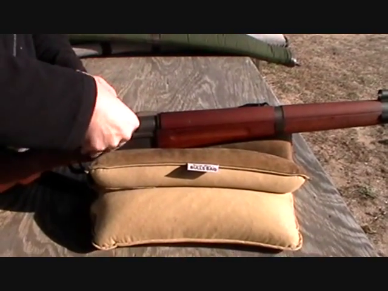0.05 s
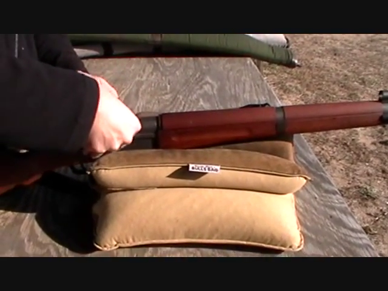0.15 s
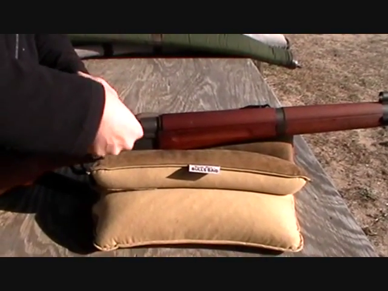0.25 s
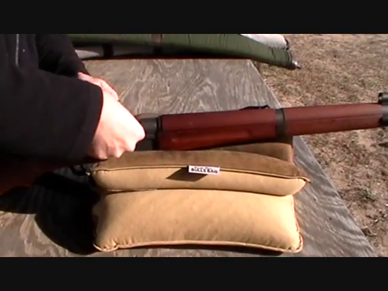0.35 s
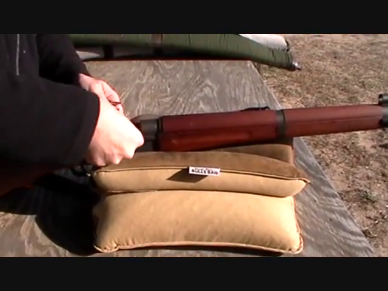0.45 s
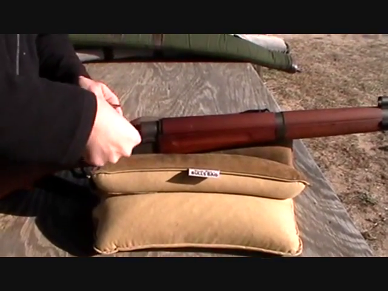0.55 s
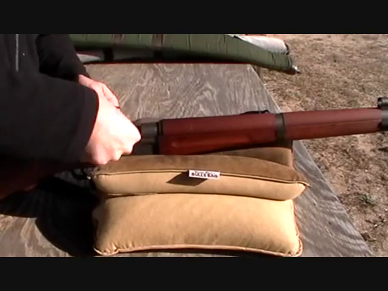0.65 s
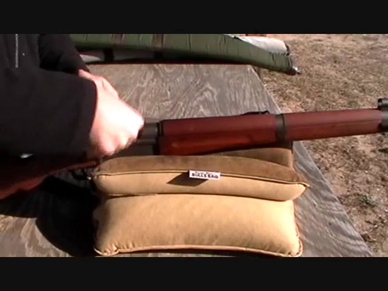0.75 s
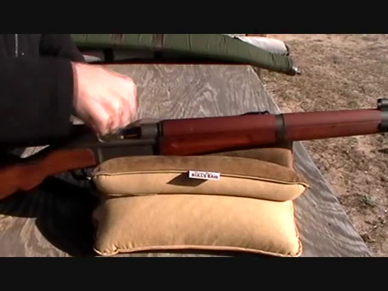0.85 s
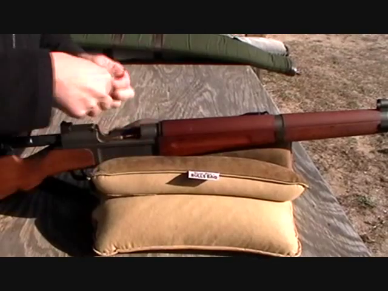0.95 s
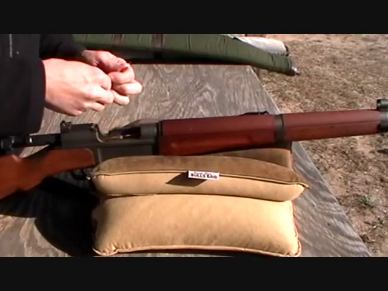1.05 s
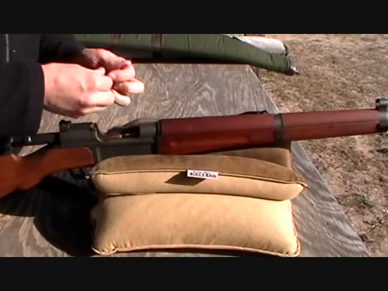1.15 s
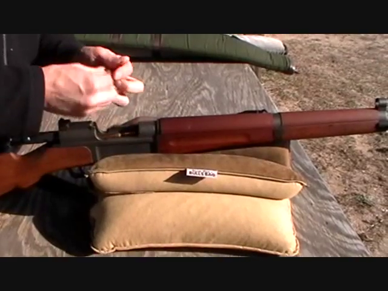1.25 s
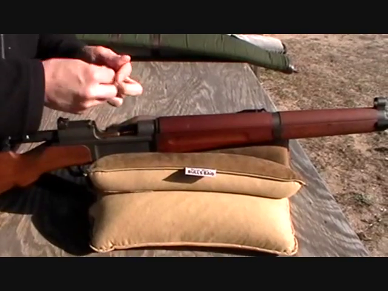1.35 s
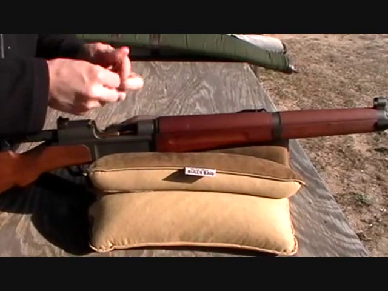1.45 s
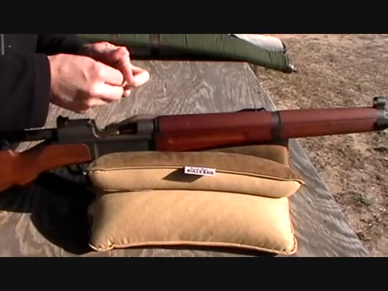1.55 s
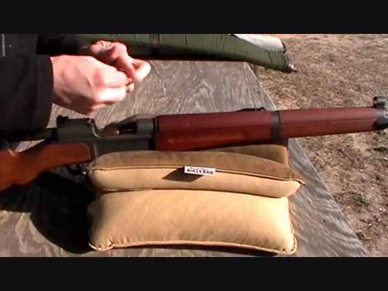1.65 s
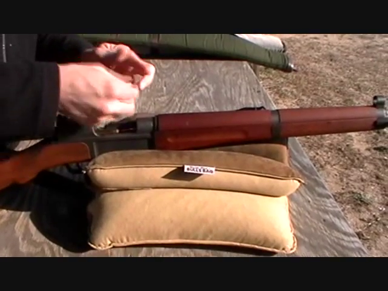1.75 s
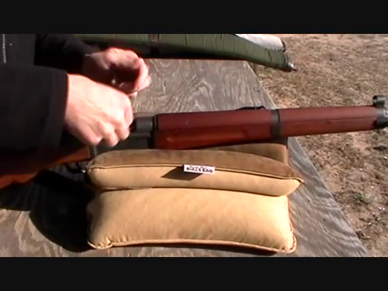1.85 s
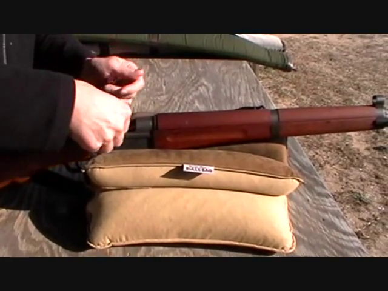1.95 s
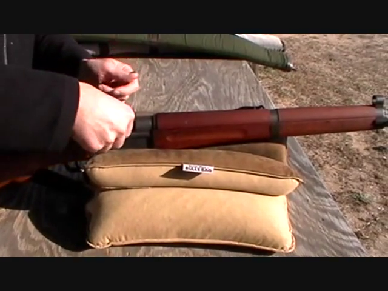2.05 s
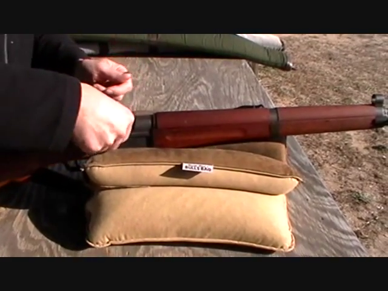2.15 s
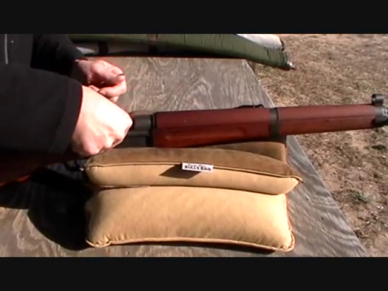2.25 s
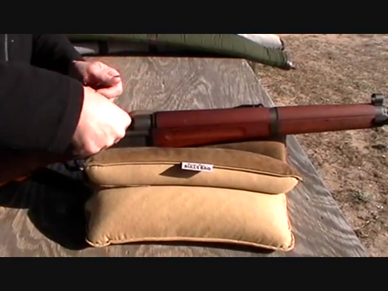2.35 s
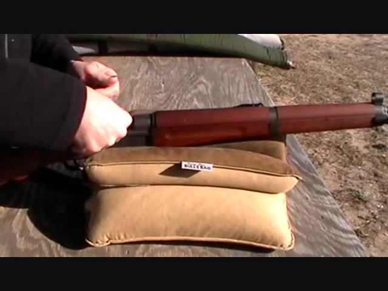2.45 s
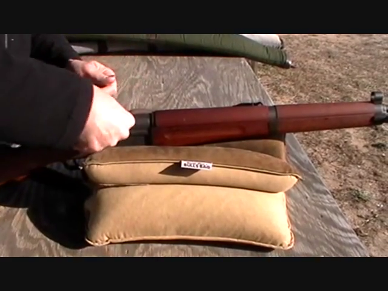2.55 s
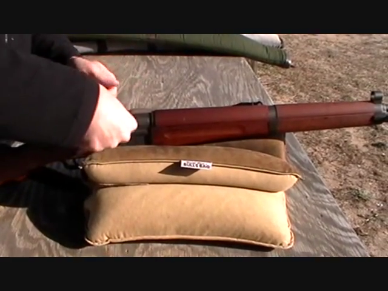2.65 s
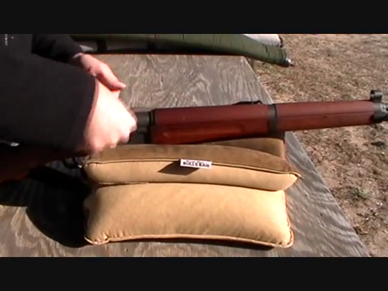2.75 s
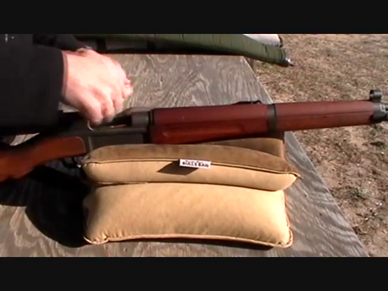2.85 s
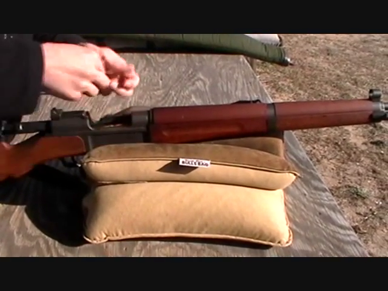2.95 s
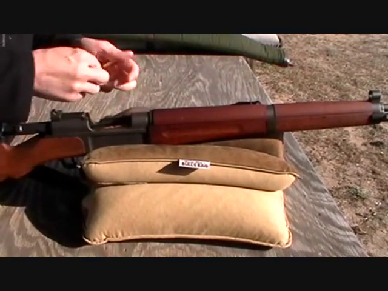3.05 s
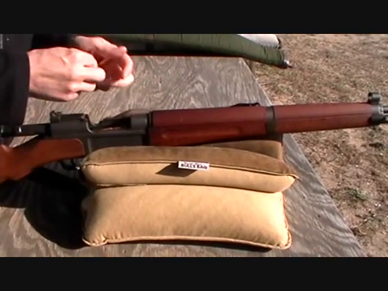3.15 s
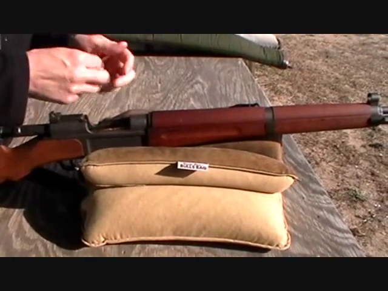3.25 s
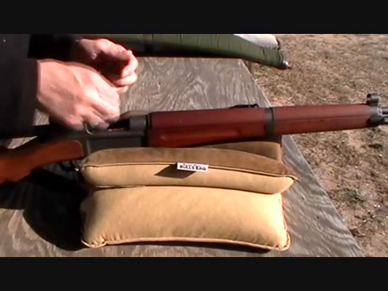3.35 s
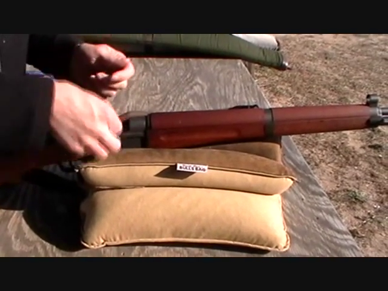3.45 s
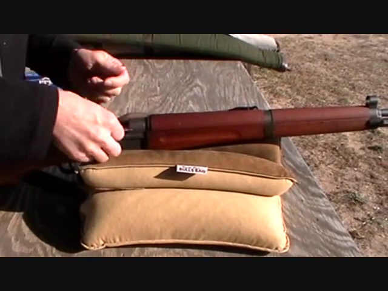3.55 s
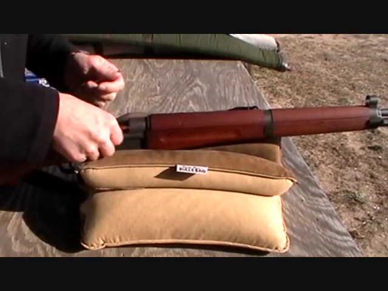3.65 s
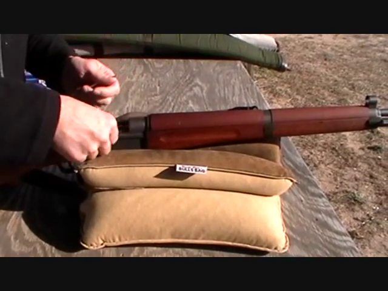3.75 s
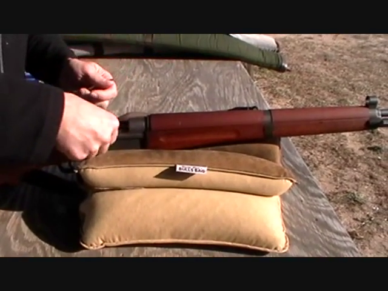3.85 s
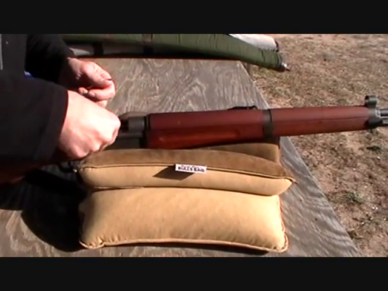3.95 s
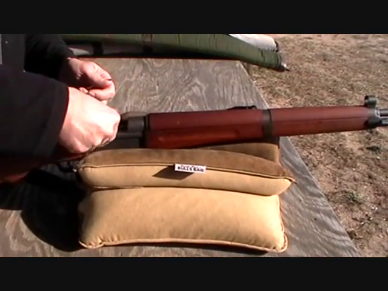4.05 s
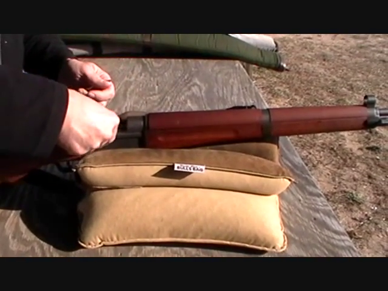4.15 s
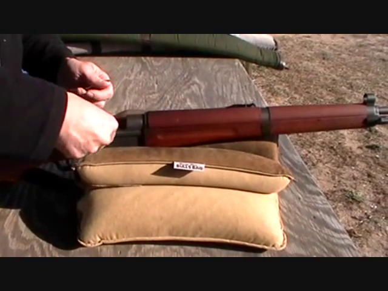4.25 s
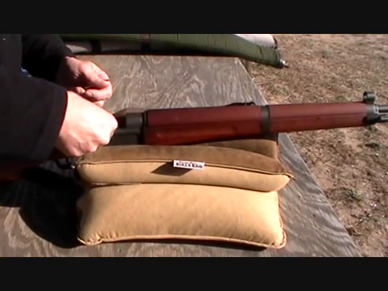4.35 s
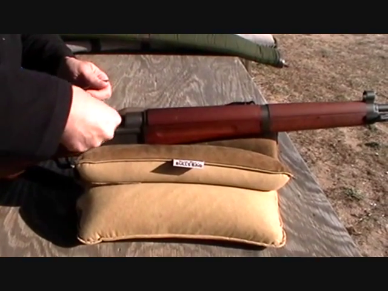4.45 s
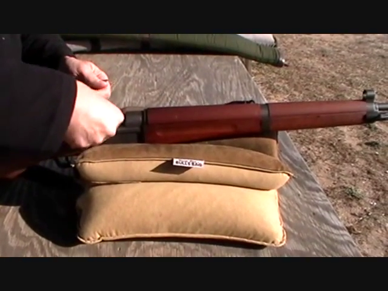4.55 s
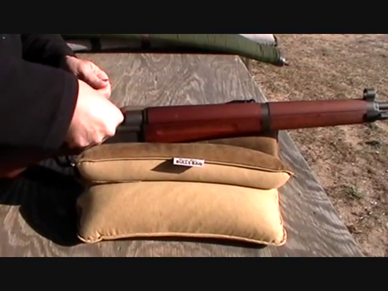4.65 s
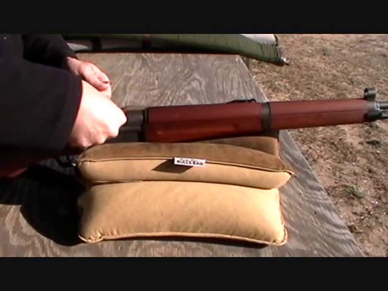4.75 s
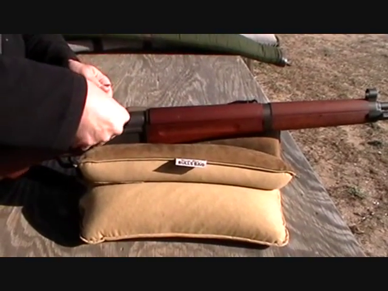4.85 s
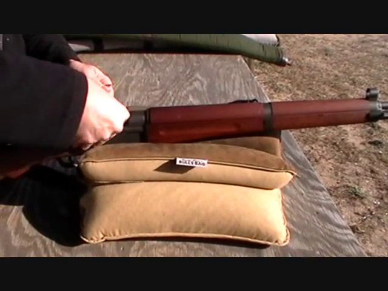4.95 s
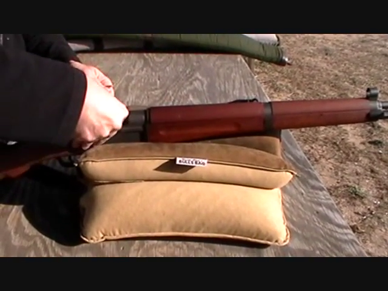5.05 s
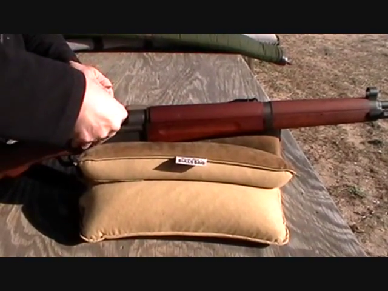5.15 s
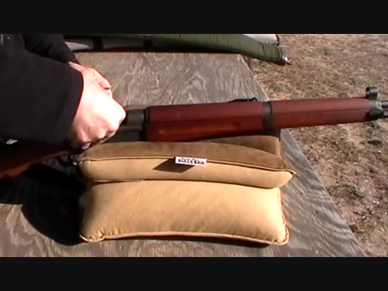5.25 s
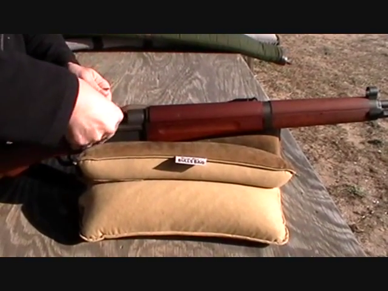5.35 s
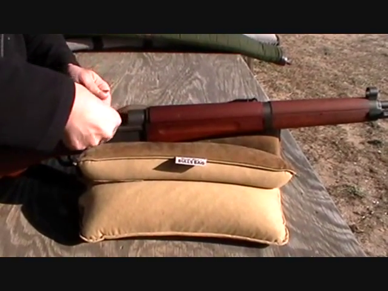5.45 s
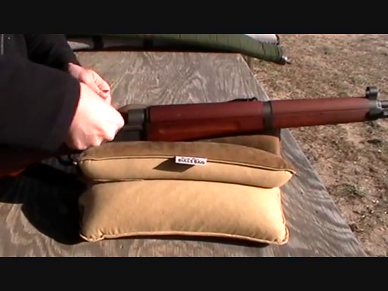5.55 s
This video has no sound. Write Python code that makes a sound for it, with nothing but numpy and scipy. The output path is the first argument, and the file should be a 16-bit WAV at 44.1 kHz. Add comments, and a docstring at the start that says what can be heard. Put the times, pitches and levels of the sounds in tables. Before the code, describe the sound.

Close, sharp metallic clacks and small brass pings as rounds are pressed into a rifle, with quiet handling pauses and faint open-air noise.

```python
"""A soft outdoor rush, made of shaped noise, runs throughout, with faint ticks of cases in a palm. From 0.1 s a
brass cartridge is pressed into a rifle on sandbags: scraping noise, cracks that ring steel, a thud. Skin and
sleeve brush past from 0.4 s, loose cases clink from 0.5 s as ringing tones, and knocks start at 0.9 s. More
cases are pressed in from 2.5 s, between short scrapes, the last one at 5.4 s. The shooting shelter answers each
contact with decaying noise echoes, and the open ground echoes faintly."""
import sys
import numpy as np
from scipy import signal
from scipy.fft import rfft, irfft, next_fast_len
from scipy.io import wavfile
from scipy.ndimage import uniform_filter1d

SR = 44100
rng = np.random.default_rng(int(sys.argv[2]) if len(sys.argv) > 2 else 0)


def persist_wave(psi):
    """Save psi, clipped to +-1, as 16-bit WAV."""
    counts = np.round(np.clip(psi, -1, 1) * 32767).astype(np.int16)
    wavfile.write(sys.argv[1], SR, np.atleast_2d(counts).T)


N = 247401
T = np.arange(SR // 4) / SR  # a quarter second of time, enough for one contact

# how the steel action rings when struck: f/Hz, level/dB, time to fall 60 dB (t60)/s
STEEL_MODES = [(416.7, -22, 0.12), (824.5, -13.5, 0.068), (1286, -16, 0.056), (1736, -1, 0.022),
               (3030, -12.5, 0.017), (3203, -7, 0.04), (3490, -5.5, 0.053), (3772, -10.5, 0.051),
               (5197, -4, 0.035), (5805, -12, 0.028), (6665, 1.5, 0.013), (7590, -9, 0.028),
               (9850, -13.5, .03), (10750, -2.5, 0.022)]
# tone of a hard crack or rub: f/Hz, level per Hz/dB
CRACK_TONE = [(45, -57), (130, -27), (300, -19.5), (580, -26.5), (800, -4.5), (1100, -5.5), (1800, 2),
              (2400, -1), (3100, 6), (4500, -4), (7000, -2), (9000, -6), (11000, -9), (12200, -14),
              (15500, -19)]


def amp(db):
    """Turn decibels into a gain."""
    return 10 ** (np.asarray(db) / 20)


def unit(x):
    """Scale x to an average (rms) level of 1."""
    return x / np.sqrt(np.mean(x ** 2) + 1e-20)


def unit_attack(x):
    """Scale x to rms 1 over the loudest 3.5 ms of its first 0.1 s."""
    loudest = uniform_filter1d(x[:SR // 10] ** 2, size=154).max()
    return x / np.sqrt(loudest + 1e-20)


def along(points, hz):
    """Read a curve of (Hz, value) points, spaced as the ear hears pitch (log axis)."""
    f, v = np.transpose(points)
    return np.interp(np.log(hz + 1), np.log(f + 1), v)


def add(track, s, x):
    """Mix x into the track at time s."""
    i = round(s * SR)
    track[..., i:i + x.shape[-1]] += x[..., :N - i]


def filtered(x, response):
    """Multiply the spectrum of x by a response to frequency."""
    m = next_fast_len(N + SR // 2)
    spectrum = rfft(x, m) * response(np.fft.rfftfreq(m, 1 / SR))
    return irfft(spectrum, m)[..., :N]


def coloured(x, points, size=1024):
    """Give x the tone of (Hz, dB) points, with a filter that never sounds ahead of its input."""
    gain = amp(along(points, np.fft.rfftfreq(size, 1 / SR)))
    cepstrum = irfft(np.log(gain))
    # folding the cepstrum forward in time gives the minimum-phase filter
    cepstrum[1:size // 2] *= 2
    cepstrum[size // 2 + 1:] = 0
    impulse = irfft(np.exp(rfft(cepstrum)))
    return signal.fftconvolve(x, impulse)[:len(x)]


def voiced(x, body_db, presence_db, treble_db):
    """The place and hardness of a contact weight its lows and highs around the 3 kHz clack."""
    low = [(2000, body_db), (2900, 0.0015), (3650, 0.0022)]
    high = [(4600, presence_db), (6900, presence_db), (8600, treble_db)]
    return coloured(x, low + high)


def ring(modes, spread_db, detune):
    """Struck metal or wood: a sum of fading (Hz, dB, t60) tones, a little different each time."""
    out = np.zeros(len(T))
    luck = rng.standard_normal((len(modes), 3))
    for (hz, db, t60), (level, pitch, sign) in zip(modes, luck):
        t = T[T < t60]
        strength = np.sign(sign) * amp(db + spread_db * level)
        fade = np.exp(-np.log(1000) * t / t60)
        tone = np.sin(2 * np.pi * hz * (1 + detune * pitch) * t)
        out[:len(t)] += strength * fade * tone
    return out


def burst(t60, hold):
    """Metal chatters on metal for an instant (noise), then dies away."""
    return rng.standard_normal(len(T)) * amp(-60 * np.maximum(T - hold, 0) / t60)


def rush(spectrum, patchy_db):
    """Stereo noise of rms 1 whose gain varies in random patches of time and pitch."""
    # how alike left and right are: f/Hz, likeness from 0 to 1
    likeness = [(60, 0.68), (130, 1), (290, 0.87), (640, 0.87), (1410, 0.86), (3100, 0.6), (6820, 0.4),
                (15000, 0.37)]
    z = signal.stft(rng.standard_normal((2, N)), nperseg=512)[2]
    field = uniform_filter1d(rng.standard_normal(z.shape[1:]), size=4, axis=0)
    field = uniform_filter1d(field, size=20, axis=1)
    pair = signal.istft(z * amp(patchy_db * unit(field)), nperseg=512)[1][:, :N]

    def mid_and_side(hz):
        turn = np.arccos(np.clip(along(likeness, hz), -1, 1)) / 2
        return amp(along(spectrum, hz)) * [np.cos(turn), np.sin(turn)]

    mid, side = filtered(pair, mid_and_side)
    return unit(np.array([mid + side, mid - side]))


def outdoors():
    """Far rumble, two slowly shifting bands of rush around 0.8 and 1.6 kHz, and a thin hiss, all shaped noise."""
    # slow rise and fall of the rush: t/s, low rush level/dB, high rush level/dB
    rush_levels = [(0.0, -56.5, -53), (1.14, -56.5, -56), (1.54, -57, -52), (2.7, -50.5, -53.5),
                   (3.4, -51.5, -54.5), (3.87, -51.5, -52.5), (5.27, -52, -52.5), (5.6, -48.5, -52)]
    # tones of far rumble, low rush, high rush and hiss: f/Hz, level per Hz/dB
    rumble_tone = [(15, -43), (28, -21), (43, -10), (65, -3.5), (100, 0), (150, 2.5), (200, -6), (300, -5),
                   (450, -6), (620, -19), (900, -32), (2000, -81)]
    low_tone = [(100, -50.5), (300, -30), (600, -7), (800, 1.5), (1100, -2), (1400, -5.5), (2000, -27.5),
                (4000, -71)]
    high_tone = [(900, -27), (1300, -2), (1650, 3.5), (2000, -5.5), (2500, -6), (3200, -21), (5000, -34.5),
                 (9000, -62)]
    hiss_tone = [(1500, -13.5), (3000, 5), (5000, 1.5), (8000, -2.5), (11000, -5.5), (15500, -9.5)]
    s, *columns = np.transpose(rush_levels)
    low_db, high_db = [np.interp(np.arange(N) / SR, s, c) for c in columns]
    # each rush has a constant gain on top of its moving level
    low_gain_db, high_gain_db = 1.6, -0.07
    low = amp(low_db + low_gain_db) * rush(low_tone, patchy_db=1.0)
    high = amp(high_db + high_gain_db) * rush(high_tone, patchy_db=0.5)
    hiss = amp(-65) * rush(hiss_tone, patchy_db=.8)
    rumble = amp(-54.5) * rush(rumble_tone, patchy_db=1.5)
    return low + high + rumble + hiss


def fingers(level_db, count=40):
    """Faint ticks of cases shifting in the palm: fading noise at random times."""
    track, t = np.zeros(N), T[:SR // 25]
    for when, size, length in rng.random((count, 3)):
        tick = rng.standard_normal(len(t)) * amp(-60 * t / (.008 + 0.05 * length))
        add(track, when * (N - 1) / SR, amp(level_db + 9 * size) * tick)
    return voiced(coloured(track, CRACK_TONE), -2.5, 3.6, 4)


def slide(length, scrape_db, hollow_db):
    """Tiny slips of a case along the steel rattle the action and make the magazine ring."""
    # hollow ring of the magazine: f/Hz, level/dB, t60/s
    hollow_modes = [(435, -22, 0.054), (794, -3, 0.087), (834, -1.5, 0.051), (1180, -5.5, 0.025),
                    (1600, 0, 0.02345)]
    stroke = np.clip(np.minimum(T, length - T) / .005, 0, 1)  # 5 ms to start and to stop
    grain = amp(5.4 * rng.standard_normal(len(T)))
    slips = stroke * rng.standard_normal(len(T)) * grain

    def through(modes):
        body = ring(modes, spread_db=1.5, detune=.008)
        return unit_attack(signal.fftconvolve(slips, body)[:len(T)])

    rough = unit_attack(coloured(slips, CRACK_TONE))
    scrape = unit_attack(voiced(rough + amp(-13.5) * through(STEEL_MODES), -1.7, 0, -0.38))
    return amp(scrape_db) * scrape + amp(hollow_db) * through(hollow_modes)


def rattle(t60, uneven_db, count=90):
    """Loose parts bounce a few hundred times a second, unevenly, as they settle."""
    bounces = np.interp(T, np.linspace(0, T[-1], count), rng.standard_normal(count))
    shake = unit(amp(uneven_db * np.clip(bounces, -2, 2)))
    return rng.standard_normal(len(T)) * shake * amp(-60 * T / t60)


def snap(body_db, bright_db):
    """Each contact is a hard crack that sets the steel action ringing; spring and loose parts rattle on."""
    # a brighter contact has more presence too, and is more crack than ring
    presence_db = 2.5 + 0.55 * bright_db
    steel_db = -5.5 - .15 * bright_db
    crack = unit_attack(coloured(burst(t60=0.013, hold=0.0012), CRACK_TONE))
    steel = amp(steel_db) * unit_attack(ring(STEEL_MODES, spread_db=0.5, detune=0.011))
    blow = unit_attack(voiced(crack + steel, body_db, presence_db, bright_db))
    loose = unit(voiced(coloured(rattle(t60=0.23, uneven_db=8.0), CRACK_TONE), 0.87, 3, 2))
    return blow + amp(-39.5) * loose


def thud():
    """A firm push passes through the sandbags, which soften its start, into the bench top."""
    # ring of the bench top: f/Hz, level/dB, t60/s
    bench_modes = [(97, 3, 0.2), (130, -0.5, .1), (231, -1.5, 0.1)]
    soft_start = 1 - np.exp(-T / .009)
    return unit_attack(ring(bench_modes, spread_db=3, detune=.02) * soft_start)


def loads():
    """A cartridge slides in, clicks past the lip, scrapes down, seats with a thud and rebounds."""
    # cartridges pressed into the magazine: t/s, click level/dB, travel until seated/s, seat level/dB,
    # brightness/dB, scrape level/dB, bench thud level/dB
    presses = [(0.1166, -5.5, 0.0018, -6, 3, -31, -45), (2.4993, -7, 0.016, -7, 6.5, -36, -51),
               (3.8532, -13, 0.003, -14, -4, -40, -52), (4.4712, -12, .013, -7, 6, -14.5, -33),
               (5.41, -9, .018, -3, 3, -16, -40)]
    lead_in_s, lead_in_db = .017, -24.5  # slide up to the lip; scrape and hollow ring against the click
    rebound_s, rebound_db = .0048, -9  # the spring throws it back once; level against the seat
    for s, click_db, travel, seat_db, bright_db, scrape_db, thud_db in presses:
        seated = s + travel
        # each stage has its own body and extra brightness, in dB
        lip = snap(-7.5, bright_db + .5)
        seat = snap(-6.5, bright_db + 3)
        rebound = snap(.5, bright_db + 1)
        yield s - lead_in_s, amp(click_db) * slide(lead_in_s + .004, lead_in_db, lead_in_db)
        yield s, amp(click_db) * lip
        # it scrapes on for 11 ms after seating, and the magazine rings
        yield s, slide(travel + 0.011, scrape_db, hollow_db=-26)
        yield seated, amp(seat_db) * seat + amp(thud_db) * thud()
        yield seated + rebound_s, amp(seat_db + rebound_db) * rebound


def reflections(stretch, delay, width):
    """A stereo echo tail, its middle of energy 1, in which each frequency dies at its own speed."""
    # decay of the shelter before stretching: f/Hz, t60/s
    decay = [(200, .25), (1400, 0.29), (3700, 0.28), (9700, 0.24), (15000, 0.11)]
    # tone of the reflections: f/Hz, level/dB
    echo_tone = [(100, -0.5), (800, -3.5), (1600, -0.5), (3300, -1.5), (4800, 1), (8000, -6.5), (15000, 2)]
    hz, t, z = signal.stft(rng.standard_normal((2, len(T))), SR, nperseg=256)
    t60 = stretch * along(decay, hz)[:, None]
    fade = amp(along(echo_tone, hz)[:, None] - 60 * t / t60)
    mid, side = signal.istft(z * fade, SR, nperseg=256)[1][:, :len(T)] * (T > delay)
    return np.array([mid + width * side, mid - width * side]) / np.linalg.norm(mid)


def shelter(early_db, tail_db):
    """Echo pattern: the direct sound, quick bounces off bench and rifle, and the shelter's tail."""
    early = amp(early_db) * reflections(stretch=0.28, delay=0.0044, width=0.38)
    tail = amp(tail_db) * reflections(stretch=1.05, delay=0.016, width=0.19)
    answer = early + tail
    answer[:, 0] += 1  # direct sound
    return answer


def microphone(x, bass_hz):
    """The two ports lose the deepest bass and differ in level, and in phase in the top treble."""
    # balance of the two sides: f/Hz, left minus right level/dB
    balance = [(100, 0), (800, 0.5), (1800, 1), (3000, 3.5), (4500, 3), (6500, -0.5), (10000, -1.5),
               (15000, -3.5)]

    def response(hz):
        port = amp(along(balance, hz) / 2) * np.exp(.22j * (hz / 12000) ** 2)
        bass_cut = hz / (hz - 1j * bass_hz)
        return bass_cut * port ** np.array([[1], [-1]])  # opposite tilt left and right

    return filtered(x, response)


def open_ground(x, t60):
    """Ground and trees scatter a long, faint echo back: noise that swells, then fades."""
    # tone of the far echo: f/Hz, level/dB
    far_tone = [(500, -13), (2500, -4), (4500, 0), (6500, -12), (10000, -11), (15000, -17)]
    t = np.arange(SR) / SR
    tails = [unit(coloured(rng.standard_normal(SR), far_tone)) for _ in range(2)]
    tails = tails * amp(-60 * t / t60) * (1 - np.exp(-t / 0.072))
    tails = tails / np.linalg.norm(tails[0])
    return signal.fftconvolve(x.mean(axis=0)[None], tails, axes=1)[:, :N]


def rubs():
    """Skin and sleeve brush the stock in short swells of grainy noise."""
    # brushes: t/s, level/dB
    brushes = [(.424, -58.5), (.70, -57.5), (2.303, -59), (3.788, -55.5)]
    t = np.arange(N) / SR
    half_length = 0.035  # s
    swell = sum(amp(db) * np.exp(-((t - s) / half_length) ** 2) for s, db in brushes)
    fibres = rng.standard_normal(N) * amp(2.6 * rng.standard_normal(N))
    return swell * unit(voiced(coloured(fibres, CRACK_TONE), -6.5, 4, 3.9))


def clinks():
    """A gripped case only ticks; a loose one pings until the fingers choke it, and a little sings on."""
    # brass against brass: t/s, level/dB, pitch f/Hz, overtone level/dB, ring level over tick/dB
    touches = [(.541, -43, 5220, -4, -3), (.806, -47, 5100, -20, 0.5), (.942, -47, 6000, 0, -27),
               (1.261, -50.5, 5740, -20, -14), (1.43, -47.5, 5720, -5.5, -4), (1.544, -26, 5480, 1.5, -6.5),
               (1.652, -30.5, 5445, 1, 9.5), (1.658, -29, 5444, 6, 4.5), (3.208, -51.5, 5200, -19.5, -9),
               (3.3667, -41.5, 5250, -16, 1.5), (3.649, -18.5, 5276, -28.5, 6.5),
               (3.8245, -18.5, 5195, -44, 2.5), (3.843, -33, 5180, -25, 7), (3.856, -13, 5250, -7, 3.5),
               (4.611, -32.5, 5370, -30, 7), (4.892, -49.5, 5400, -29, -3), (5.191, -51.5, 5010, -29, -7)]
    # tones of a cartridge case: multiple of its pitch, level/dB, share of the overtone level from 0 to 1
    case_modes = [(.44, -3.5, 0.29), (.955, -4.5, 0.038), (1, 2.5, 0), (1.022, 5, 0.08),
                  (1.05, -12.5, 0.36), (1.24, -6.5, 0.94), (1.45, -4.5, 0.85), (1.825, -3, 0.89),
                  (1.86, 0.5, 0.88), (1.905, -12, 0.94), (1.975, -12.5, 1)]
    # tick of thin brass: f/Hz, level per Hz/dB
    tick_tone = [(300, -33), (1200, -3.5), (2400, -3.5), (3200, -7), (4300, -7), (5500, -1), (6300, -5),
                 (7500, -4.5), (9000, -8), (10200, -4), (12000, -12.5), (15500, -18.5)]
    for s, db, hz, overtone_db, ring_db in touches:

        def ping(t60):
            modes = [(hz * ratio, level + upper * overtone_db, t60) for ratio, level, upper in case_modes]
            return unit_attack(ring(modes, spread_db=2, detune=.004))

        brass = ping(t60=0.028) + amp(-22) * ping(t60=0.11)  # choked ping, then the faint song
        tick = coloured(burst(t60=0.0087, hold=.001), tick_tone)
        tick = unit_attack(voiced(tick, 0, 0, overtone_db / 2))
        yield s, amp(db) * unit_attack(tick + amp(ring_db) * brass)


def taps():
    """Cases knock on the action while they are lined up."""
    # single knocks: t/s, level/dB, body/dB, brightness/dB
    knocks = [(.8502, -20.5, 6, 1.5), (2.0257, -24, -5, -16), (2.0488, -16.5, 1, 0),
              (2.1236, -12.5, 8.5, 9), (2.1327, -15.5, 2.5, 2), (2.488, -14.5, -22, -8.5),
              (2.8214, -33.5, 7, -9.5), (3.606, -19, 8, 9), (3.6481, -19, 10.5, 12),
              (3.847, -21.5, -7.5, -10.5), (3.9501, -40.5, 2, -7.5), (4.219, -38, 1.5, -11),
              (4.235, -33.5, -0.5, -18.5), (4.286, -13.5, -4, -4.5), (4.4617, -31.5, -9.5, -3),
              (4.5349, -20, -0.5, -17.5), (4.6176, -33, 6, -8.5), (4.947, -25, 0.5, -22.5)]
    for s, db, body_db, bright_db in knocks:
        yield s, amp(db) * snap(body_db, bright_db)


def slides():
    """Cases are nudged into place in short strokes along the steel."""
    # strokes: start t/s, scrape level/dB, hollow magazine ring level/dB
    strokes = [(2.464, -45.5, -43), (3.605, -34, -36.5), (3.648, -42, -32.5), (3.821, -43, -36.5),
               (4.218, -52, -37), (4.283, -38, -32.5), (4.604, -51, -43.5)]
    for s, scrape_db, hollow_db in strokes:
        yield s, slide(.029, scrape_db, hollow_db)  # each lasts 29 ms


def scene(count=8):
    """All the handling under the shelter, with the open air around it."""
    rooms = [shelter(early_db=-12.5, tail_db=-20.0) for _ in range(count)]
    near = np.zeros((2, N))
    for source in (loads, taps, clinks, slides):
        for k, (s, x) in enumerate(source()):
            # eight random echo patterns of the shelter take turns
            add(near, s, signal.fftconvolve(x[None], rooms[k % count], axes=1))
    near = microphone(near, bass_hz=70)
    far = amp(-41) * open_ground(near, t60=1.9)
    return near + far + fingers(level_db=-61.5) + rubs() + outdoors()


def record(dry):
    """Peaks beyond full scale clip; the top treble fades from 15.5 kHz to nothing at 16.2 kHz."""
    return filtered(np.clip(dry, -1, 1), lambda hz: np.clip((16200 - hz) / 700, 0, 1) ** 2)


dry = scene()
out = record(dry)
persist_wave(out)
```